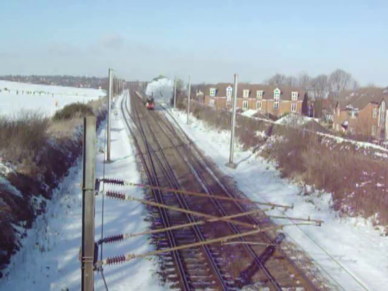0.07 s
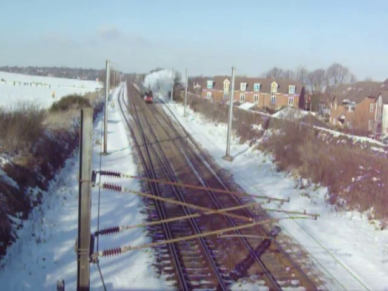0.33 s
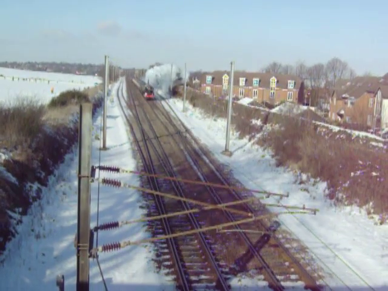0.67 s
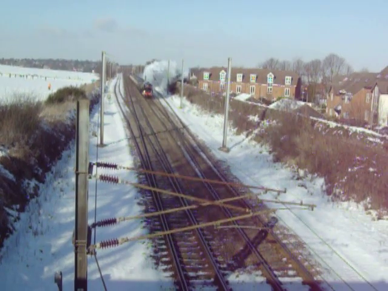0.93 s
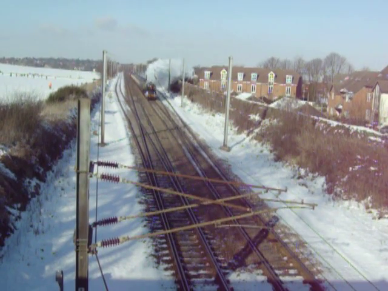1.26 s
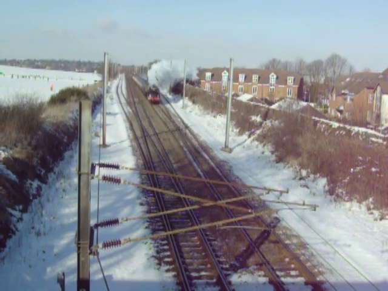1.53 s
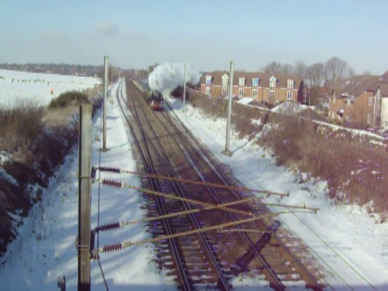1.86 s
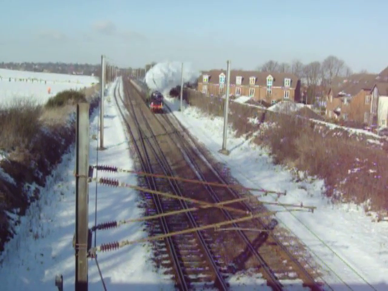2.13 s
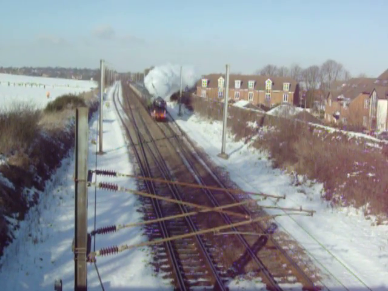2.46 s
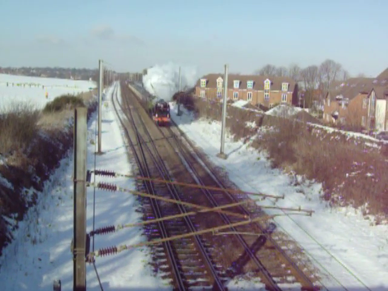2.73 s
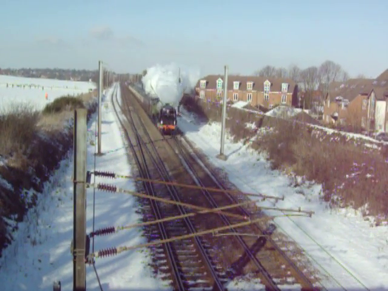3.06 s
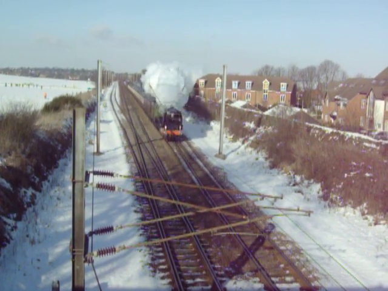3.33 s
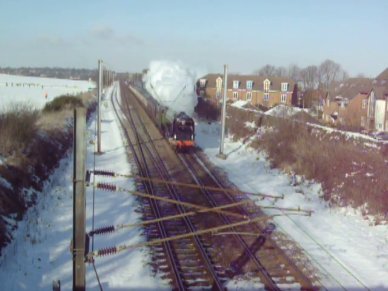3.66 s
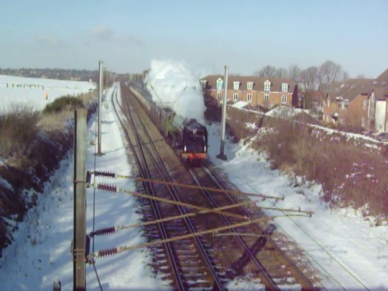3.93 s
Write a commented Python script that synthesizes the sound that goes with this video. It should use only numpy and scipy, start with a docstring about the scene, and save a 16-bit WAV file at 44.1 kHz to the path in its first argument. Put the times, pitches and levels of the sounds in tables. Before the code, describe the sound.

A steam train approaches at speed throughout, its fast exhaust beats merging into a fluttering roar over rolling wheels. Wind buffets the microphone from the start, briefly pushing the train down. The rails ring faintly, mostly from 0.5 to 2 seconds. Strong gusts return just after 2 seconds, and a few low wind thumps follow between 3.2 and 3.5. The steam hiss grows, peaking just before the end at 4 seconds.

```python
"""A steam locomotive approaches at speed along a snowy line, heard from a bridge.
From the start its exhaust beats, six to a wheel turn, merge into a fluttering roar over rolling noise,
while gusts buffet the microphone and make the gain control duck the train. The rails sing, rubbed by
the wheels, and the steam hiss grows. Strong gusts return just after 2 s; after 3 s lone eddies thump.
The hiss peaks just before the end."""
import sys
import numpy as np
from scipy import signal
from scipy.fft import rfft, irfft
from scipy.io import wavfile
from scipy.ndimage import uniform_filter1d

SR = 44100
rng = np.random.default_rng(int(sys.argv[2]) if len(sys.argv) > 2 else 0)


def int16_out(signal):
    """Quantize to a 16-bit WAV file."""
    q = np.round(np.clip(np.atleast_2d(signal).T, -1, 1) * 32767)
    wavfile.write(sys.argv[1], SR, q.astype(np.int16))


N = 176400
TIME_S = np.arange(N) / SR

# Exhaust beats of one wheel turn. Each entry: relative strength in dB.
BEAT_STRENGTH_DB = [-1.5, 3, -0.5, -1.5, -4.5, -7.5]
# Train layer envelopes. Each row: time in seconds, relative level in dB.
ROAR_ENVELOPE_DB = [(.08, -16), (0.301, -19), (.8, -20.5), (1.28, -18.5), (1.701, -22.5), (2.15, -20),
                    (2.6, -24.5), (3.0, -20), (3.06, -27), (3.15, -21), (3.3, -25), (3.5, -20.5),
                    (3.62, -21), (3.709, -25.5), (3.829, -20), (4, -24.5)]
BARK_ENVELOPE_DB = [(.04, -18), (.11, -12.5), (0.199, -16), (.65, -19.5), (.95, -16), (1.09, -20.5),
                    (1.145, -13), (1.198, -20.5), (1.701, -20.5), (2.13, -19), (2.5, -20), (2.71, -20.5),
                    (2.78, -21.5), (2.951, -17), (3.059, -17), (3.31, -25), (3.42, -23), (3.76, -23.5),
                    (3.86, -17.5), (4, -23.5)]
ROLL_ENVELOPE_DB = [(0, -19.5), (0.549, -18.5), (0.999, -18), (1.7, -16.5), (2.051, -16.5), (2.6, -19),
                    (3.25, -17.5), (4, -17.5)]
HISS_ENVELOPE_DB = [(0, -30.5), (1, -24.5), (2.001, -23), (3, -21), (3.65, -18.5), (3.802, -21.5),
                    (3.912, -14.5), (4, -18.5)]
# Noise spectra. Each row: frequency in Hz, relative density in dB.
ROAR_SPECTRUM_DB = [(25, -10.5), (60, -8.5), (130, -7.5), (200, -7.5), (265, 2), (345, -10), (440, 0.5),
                    (560, -2), (720, -4), (900, -3), (1150, -12.5), (1700, -29.5)]
BARK_SPECTRUM_DB = [(600, -30.5), (950, -12.5), (1100, -5), (1220, -5), (1400, -7), (1550, -13.5),
                    (2200, -26.5), (4000, -21)]
ROLL_SPECTRUM_DB = [(700, -11.5), (1200, -1.5), (1600, -3), (2000, -2), (2350, -1.5), (2750, -2),
                    (3100, -5.5), (3800, -7.5), (6000, -21)]
HISS_SPECTRUM_DB = [(1200, -21.5), (2400, -20.5), (3200, -4.5), (3700, -3.5), (4100, -1), (4500, -1.5),
                    (6000, -1)]
BREEZE_SPECTRUM_DB = [(20, 7), (40, -7.5), (80, -4.5), (140, 4.5), (220, 3.5), (320, 2), (500, -13),
                      (900, -36.5), (3000, -59.5)]
# Breeze between gusts. Each row: time in seconds, level in dB.
BREEZE_ENVELOPE_DB = [(0, -25.5), (1.45, -25.5), (1.68, -28), (1.85, -29), (2.4, -27), (2.7, -33),
                      (3.3, -35.5), (3.6, -26), (4, -33)]
# Gusts. Each row: start in seconds, length in seconds, level in dB, centre in Hz.
MIC_GUSTS = [(0.015, 0.033, -7, 139.7), (0.136, 0.014, -3, 170), (0.159, 0.023, -5.5, 170),
             (0.204, .065, -8.5, 161), (0.457, 0.16, -20.5, 145), (0.653, .025, -22, 107.7),
             (0.812, .065, -14.5, 140), (0.93, 0.048, -12.5, 186), (1.008, .04, -18, 100),
             (1.103, 0.07, -23.5, 154), (1.333, .05, -15.5, 161), (1.397, .14, -21.5, 153),
             (1.929, .025, -22.5, 152), (2.068, .05, -18.5, 121), (2.129, 0.031, -15.5, 179),
             (2.175, 0.015, -3, 279), (2.207, .045, -6.5, 310), (2.257, 0.069, -8, 217),
             (2.348, .075, -17, 207), (2.469, 0.035, -7, 240), (2.551, .025, -17, 176),
             (3.385, .18, -25, 160)]
# Gust spectrum. Each row: multiple of the centre frequency, relative density in dB.
GUST_SPECTRUM_DB = [(.12, -18), (.3, -7.5), (.5, -5.5), (.7, -1.5), (1, -0.5), (1.45, -5), (2.1, -10),
                    (3.3, -20.5), (6, -27), (16, -44.5)]
# Rail tones. Each row: pitch in Hz, peak time in seconds, swell sigma in seconds, level in dB, width in Hz.
RAIL_RESONANCES = [(2610, 0.6, 0.2, -33, 12), (2710, 0.59, .09, -29.5, 33), (1867, 1.2, .8, -32, 14),
                   (1097, 1.6, 0.35, -27, 39), (2540, 1.6, 0.2, -33.5, 26), (2660, 2.7, 1.9, -37, 14),
                   (1205, 0.89, 0.22, -25, 54)]
# Lone eddies. Each row: time in seconds, peak in dB, centre in Hz.
EDDY_THUMPS = [(3.188, -8.5, 211), (3.402, -2.5, 303), (3.44, -7, 270), (3.479, -10, 222),
               (3.535, -2.5, 211)]
# Recorder response. Each row: frequency in Hz, gain in dB.
RESPONSE_DB = [(20, -3), (4150, 3.5), (4400, -2), (4650, -8.5), (5100, -11.5), (5500, -18), (6200, -34.5)]


def from_db(db):
    """Decibels to gain."""
    return 10 ** (np.asarray(db) / 20)


def unit_rms(x):
    """Scale to rms 1."""
    return x / np.sqrt(np.mean(x ** 2) + 1e-20)


def envelope(points_db):
    """Gain over time from (s, dB) rows."""
    return from_db(np.interp(TIME_S, *np.transpose(points_db)))


def filtered(x, spectrum_db):
    """Filter by (Hz, dB) rows."""
    hz, db = np.transpose(spectrum_db)
    bins_hz = np.maximum(np.arange(N // 2 + 1) * SR / N, 1)
    gain_db = np.interp(np.log(bins_hz), np.log(hz), db)
    return irfft(rfft(x) * from_db(gain_db), N)


def noise(spectrum_db):
    """Coloured noise, rms 1."""
    return unit_rms(filtered(rng.standard_normal(N), spectrum_db))


def drift(rate_hz):
    """Slow random wander, rms 1."""
    bins_hz = np.arange(N // 2 + 1) * SR / N
    return unit_rms(irfft(rfft(rng.standard_normal(N)) / (1 + (bins_hz / rate_hz) ** 2), N))


def exhaust_beats(rate_hz=28.4, first_s=.0074, sharpness=1.4):
    """Blast pressure, mean 1: one rounded puff per beat, in a limping pattern of six."""
    phase = (TIME_S - first_s) * rate_hz
    beat = np.round(phase).astype(int)
    jitter_db = rng.standard_normal(beat.max() + 1)[beat]
    strength = from_db(np.take(BEAT_STRENGTH_DB, beat, mode="wrap") + jitter_db)
    puffs = strength * np.abs(np.cos(np.pi * phase)) ** (2 * sharpness)
    return puffs / puffs.mean()


def train_layer(spectrum_db, envelope_db, beats, depth, waver_db, waver_hz):
    """Turbulent noise that pulses with the exhaust and wavers on its way through the air."""
    pulse = 1 - depth + depth * beats
    return noise(spectrum_db) * envelope(envelope_db) * pulse * from_db(waver_db * drift(waver_hz))


def locomotive():
    """Low roar and bark of the chimney, rolling wheels, hissing steam."""
    beats = exhaust_beats()
    roar = train_layer(ROAR_SPECTRUM_DB, ROAR_ENVELOPE_DB, beats, depth=.13, waver_db=-.4, waver_hz=3.5)
    bark = train_layer(BARK_SPECTRUM_DB, BARK_ENVELOPE_DB, beats, depth=.19, waver_db=.3, waver_hz=36)
    roll = train_layer(ROLL_SPECTRUM_DB, ROLL_ENVELOPE_DB, beats, depth=.08, waver_db=.55, waver_hz=18)
    hiss = train_layer(HISS_SPECTRUM_DB, HISS_ENVELOPE_DB, beats, depth=.17, waver_db=.55, waver_hz=20)
    return from_db(1.5) * roar + from_db(-.5) * bark + from_db(-2.4) * roll + from_db(6) * hiss


def turbulence(spectrum_db, evenness):
    """Low rumble, rms 1; evenness from 0 to 1 flattens its short-term power."""
    rumble = noise(spectrum_db)
    power = uniform_filter1d(rumble ** 2, size=1100) + 1e-9
    return unit_rms(rumble / power ** (evenness / 2))


def wind(attack_s=.0085, release_s=.005):
    """A lumpy breeze and short gusts rumble on the microphone; faster air sounds higher."""
    out = envelope(BREEZE_ENVELOPE_DB) * turbulence(BREEZE_SPECTRUM_DB, evenness=.1)
    for start_s, length_s, db, centre_hz in MIC_GUSTS:
        before = np.maximum(start_s - TIME_S, 0) / attack_s
        after = np.maximum(TIME_S - start_s - length_s, 0) / release_s
        gate = np.exp(-np.minimum(before + after, 20))
        spectrum_db = [(centre_hz * multiple, band_db) for multiple, band_db in GUST_SPECTRUM_DB]
        out += from_db(db) * gate * turbulence(spectrum_db, evenness=.85)
    return out


def singing_rails():
    """Wheels rub narrow resonances of the steel into ringing; each swells and fades."""
    out = np.zeros(N)
    for hz, peak_s, sigma_s, db, width_hz in RAIL_RESONANCES:
        phase_rad = 2 * np.pi * hz * TIME_S
        tone = unit_rms(drift(width_hz) * np.cos(phase_rad) + drift(width_hz) * np.sin(phase_rad))
        swell = np.exp(-((TIME_S - peak_s) / sigma_s) ** 2 / 2)
        out += from_db(db) * swell * tone
    return out


def eddy_thumps():
    """Each lone eddy is one push and pull of pressure on the microphone."""
    out = np.zeros(N)
    for time_s, peak_db, centre_hz in EDDY_THUMPS:
        phase_rad = 2 * np.pi * centre_hz * (TIME_S - time_s)
        out -= from_db(peak_db) * phase_rad * np.exp((1 - phase_rad ** 2) / 2)
    return out


def scene():
    """Train and wind at one microphone."""
    return (locomotive() + singing_rails() + wind() + eddy_thumps())[None]


def gain_control(x, limit_db=-2, attack_s=.0018, release_db_per_s=75):
    """Peaks over the limit pull the gain down fast; it recovers at a steady rate."""
    over_db = np.maximum(20 * np.log10(np.abs(x) + 1e-9) - limit_db, 0)
    ramp_db = release_db_per_s * TIME_S
    held_db = np.maximum.accumulate(over_db + ramp_db, axis=-1) - ramp_db
    pole = np.exp(-1 / (attack_s * SR))
    duck_db = signal.lfilter([1 - pole], [1, -pole], held_db)
    return x * from_db(-duck_db)


def record(dry):
    """Dull treble, a brief opening silence, gain control, overload, steep low-pass."""
    start_s, clip_level, cutoff_hz = .0355, .74, 6600
    dull = filtered(dry, RESPONSE_DB) * (TIME_S >= start_s)
    clipped = np.clip(gain_control(dull), -clip_level, clip_level)
    lowpass = signal.cheby2(18, 75, cutoff_hz, fs=SR, output="sos")
    return signal.sosfilt(lowpass, clipped)


dry = scene()
out = record(dry)
int16_out(out)
```